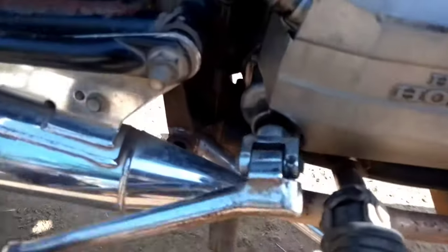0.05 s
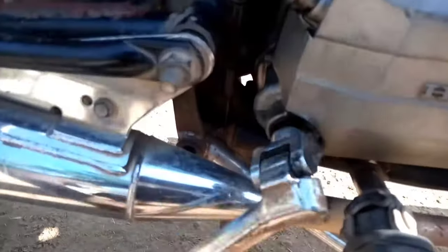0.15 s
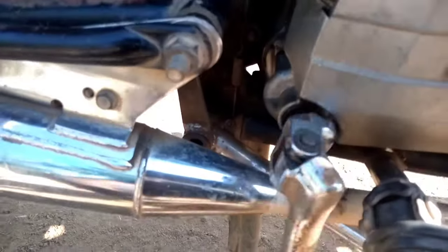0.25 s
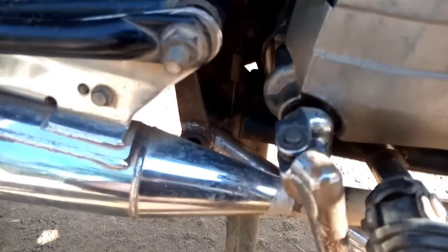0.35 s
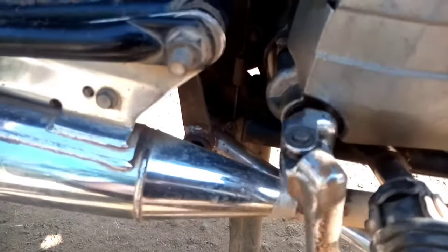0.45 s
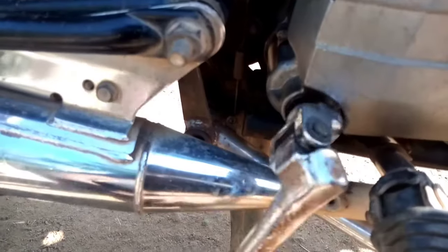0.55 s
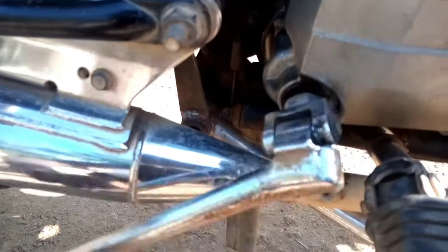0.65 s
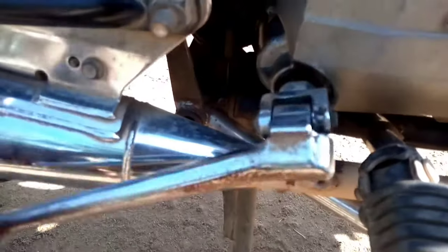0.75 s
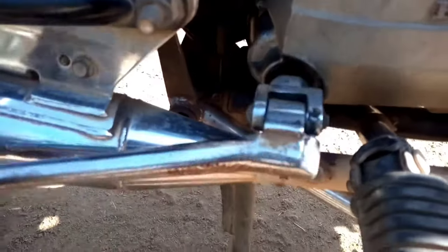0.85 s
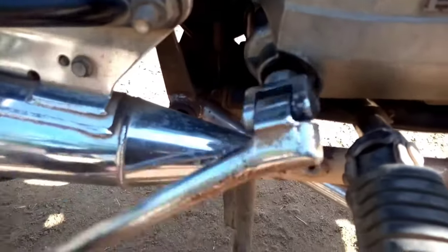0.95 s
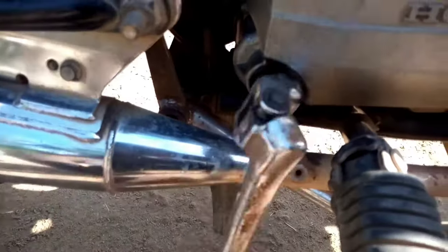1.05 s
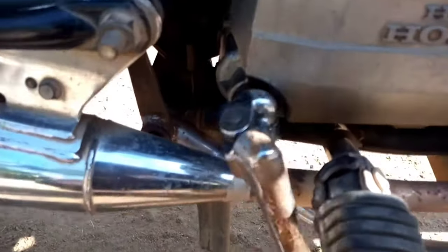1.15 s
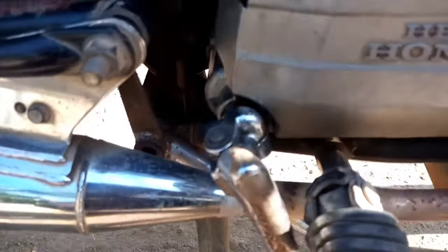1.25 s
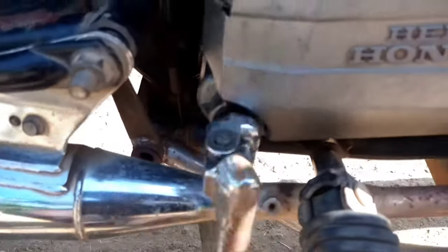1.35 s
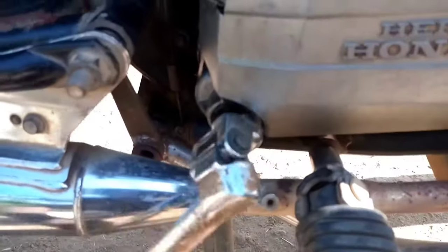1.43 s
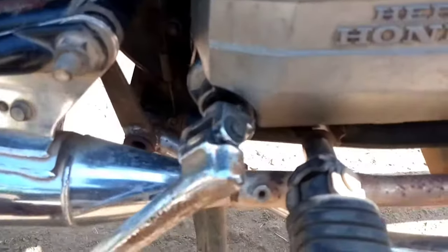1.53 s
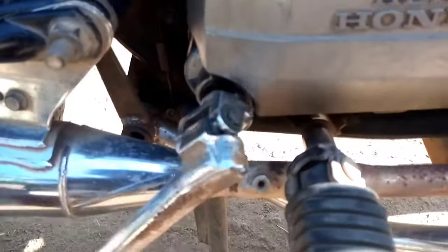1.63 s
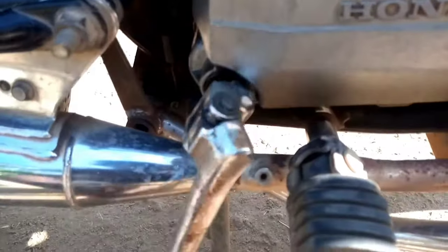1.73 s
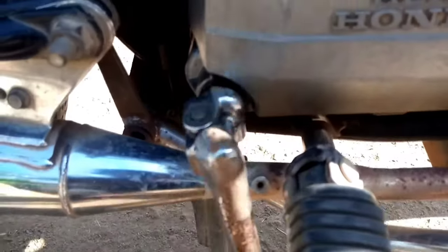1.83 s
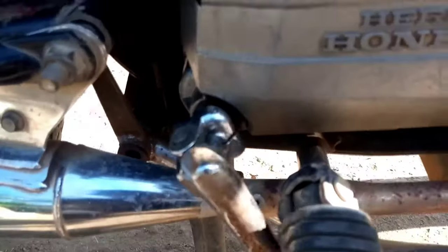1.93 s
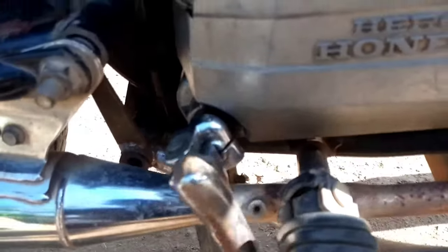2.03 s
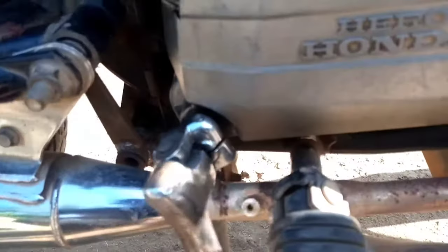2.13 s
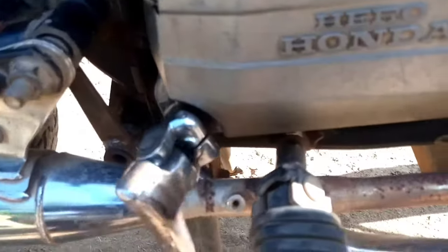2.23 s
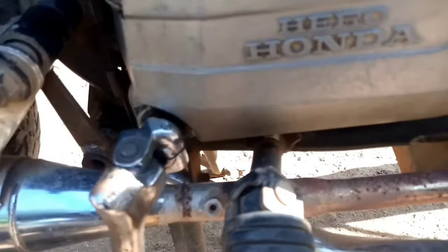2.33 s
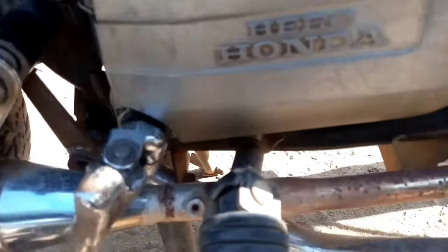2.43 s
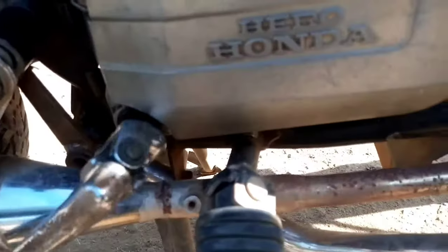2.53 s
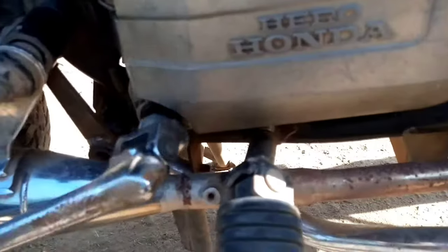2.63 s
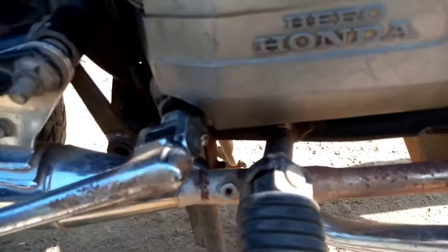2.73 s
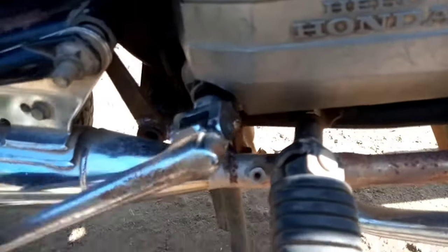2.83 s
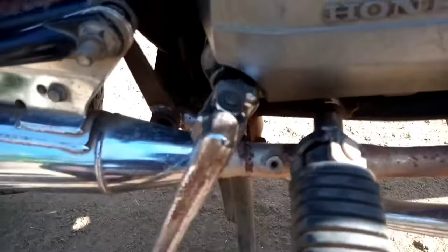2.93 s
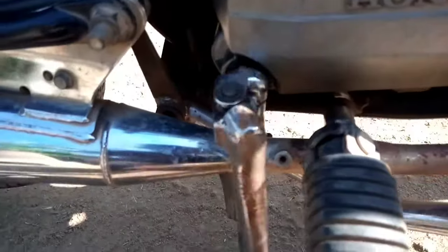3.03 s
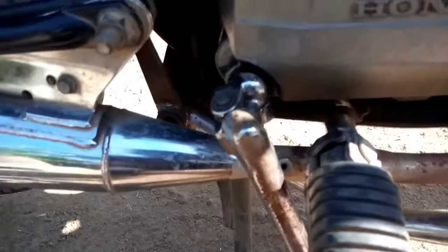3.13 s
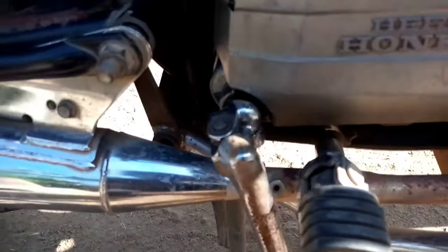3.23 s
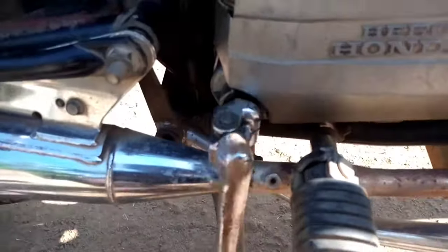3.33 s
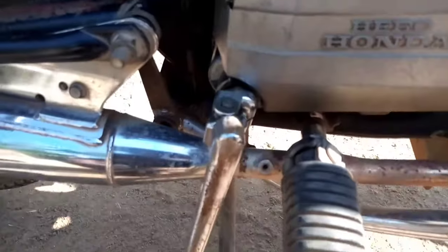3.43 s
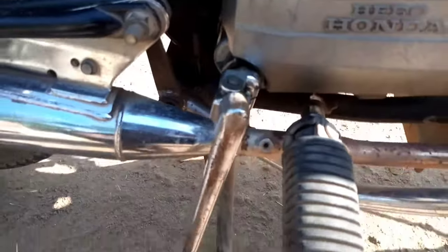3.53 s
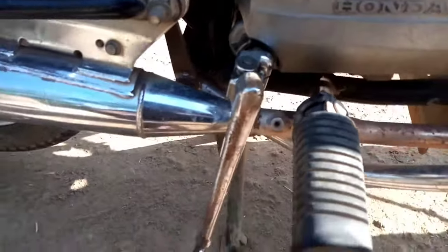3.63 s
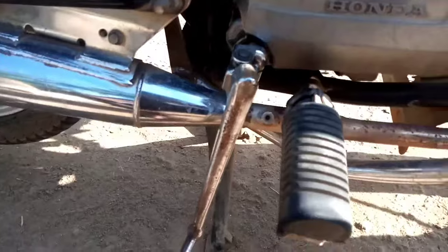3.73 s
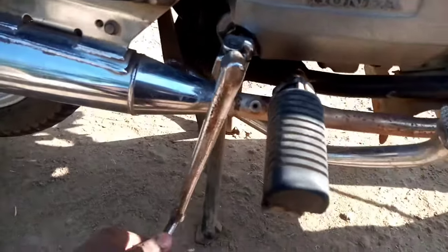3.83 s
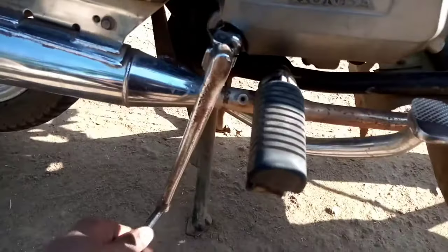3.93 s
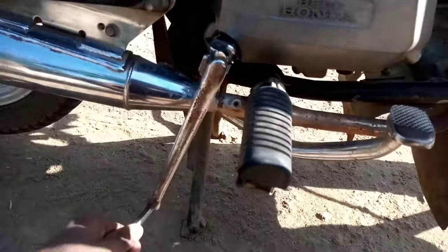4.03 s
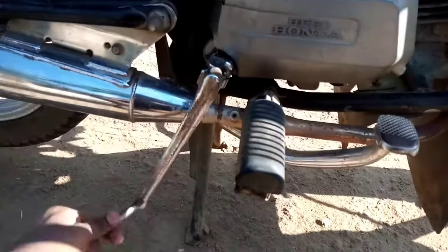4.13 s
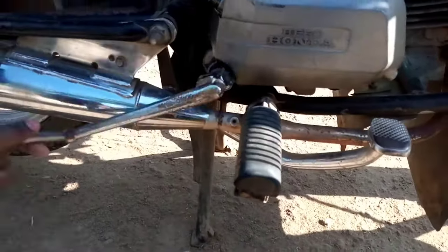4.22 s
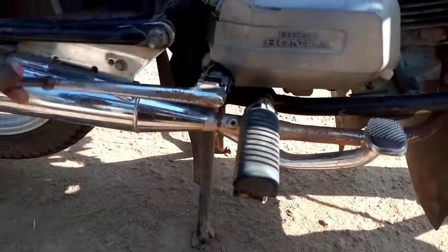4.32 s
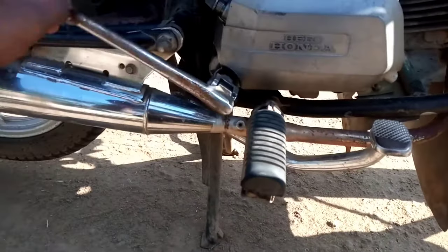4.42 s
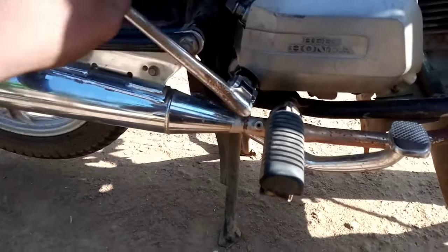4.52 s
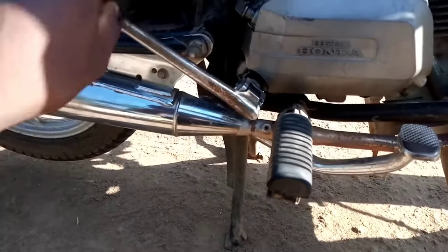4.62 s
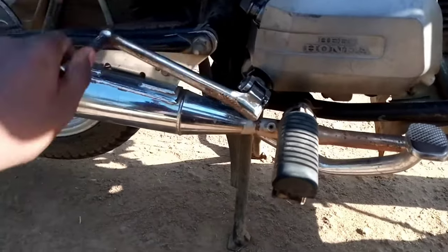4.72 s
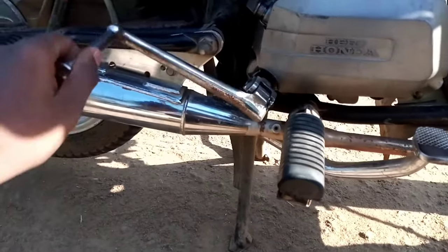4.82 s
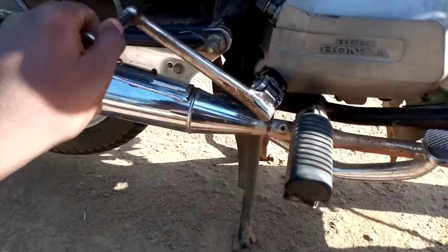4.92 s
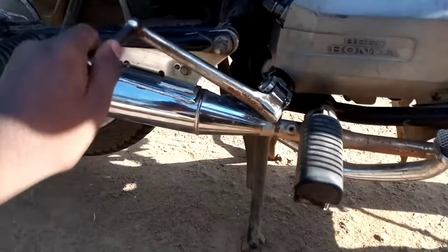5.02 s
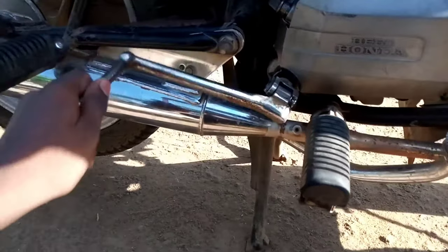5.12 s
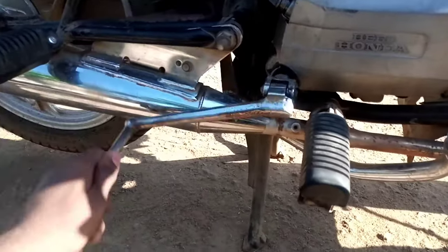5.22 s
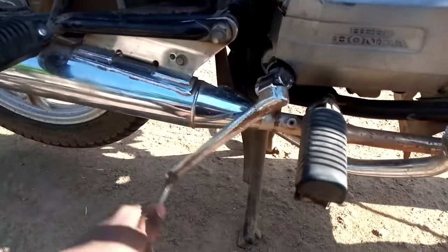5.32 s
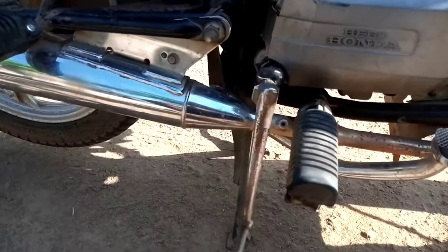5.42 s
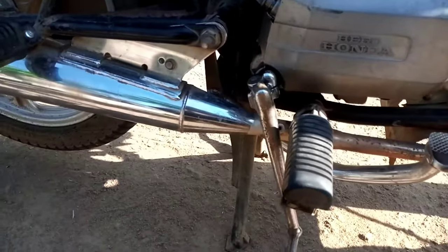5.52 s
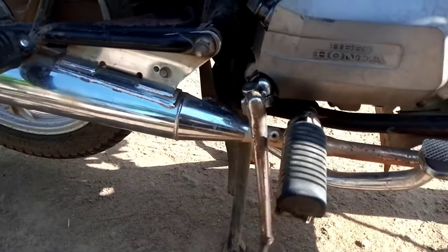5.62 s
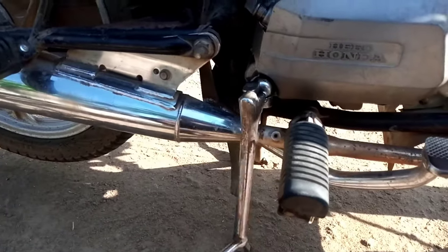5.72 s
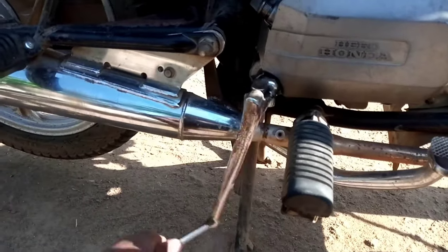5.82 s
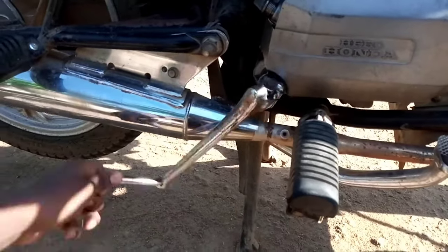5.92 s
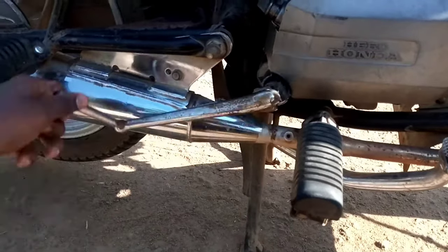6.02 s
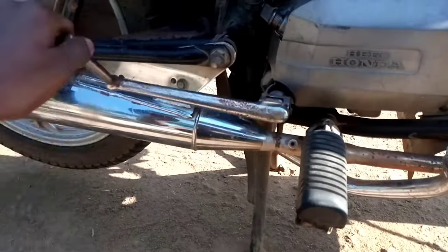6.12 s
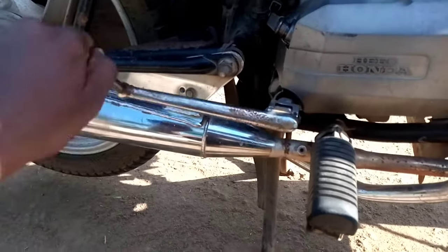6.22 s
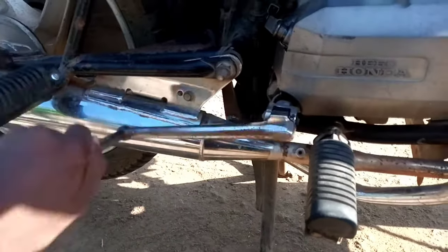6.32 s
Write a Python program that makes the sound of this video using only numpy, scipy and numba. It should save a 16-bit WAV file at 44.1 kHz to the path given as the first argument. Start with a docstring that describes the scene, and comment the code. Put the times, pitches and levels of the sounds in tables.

```python
"""A loose motorcycle kick-start lever is swung round by hand, outdoors, heard from close by.
Ratchet and pivot knock and rattle: bursts of noise contacts that also ring lever and crankcase resonators.
Gears grind and steel scrapes: banded noise that swells and coasts with each push on the lever.
The pivot squeals, pips, chirps, whistles and creaks: near-harmonic tones on pitch and level curves.
Below lie low grip rumbles, thin peeps, a faint street hush of banded noise and a far whine."""
import sys
import numpy as np
from scipy import signal
from scipy.io import wavfile
from numba import njit

SR = 44100
rng = np.random.default_rng(int(sys.argv[2]) if len(sys.argv) > 2 else 0)


def pcm_store(signal):
    """Save signal as 16-bit PCM."""
    levels = np.round(np.clip(np.atleast_2d(signal), -1, 1) * 32767)
    wavfile.write(sys.argv[1], SR, levels.astype(np.int16).T)


N = 280476


def amp(db):
    """dB to gain."""
    return 10 ** (np.asarray(db) / 20)


def rms_one(x):
    """Scale to rms 1."""
    return x / np.sqrt(np.mean(x ** 2) + 1e-20)


def in_time(rows):
    """Interpolate the columns of a curve at every sample."""
    s, *columns = np.transpose(rows)
    return [np.interp(np.arange(N) / SR, s, column) for column in columns]


def at_hz(points, hz):
    """Read a spectrum in dB on a log frequency axis."""
    f_hz, level_db = np.array(points)[:, 0], np.array(points)[:, 1]
    return np.interp(np.log(hz), np.log(f_hz), level_db)


def drift(rate_hz):
    """Slow random curve of rms 1: noise through two equal poles, at 1/40 of the sample rate."""
    r = np.exp(-80 * np.pi * rate_hz / SR)
    noise = rng.standard_normal(N // 40 + 1002)
    slow = signal.lfilter([1], [1, -2 * r, r * r], noise)[1000:]  # drop the filter's start
    return np.interp(np.arange(N) / 40, np.arange(len(slow)), rms_one(slow))


def bands():
    """Bank of band-passes 0.4 octave wide, with their centres in Hz."""
    edges_hz = 25 * 2 ** (np.arange(0, 25) * .4)
    bank = []
    for low, high in zip(edges_hz, edges_hz[1:]):
        sos = signal.butter(2, [low, high], "band", fs=SR, output="sos")
        bank.append((np.sqrt(low * high), sos))
    return bank


def grit(spread_db):
    """Two noises of uneven grains at the same moments: many small contacts, a few large."""
    size_db = spread_db * np.minimum(rng.exponential(1, N), 5)
    return rms_one(rng.standard_normal((2, N)) * amp(size_db))


def coloured(pair, spectrum, patchiness):
    """Two noises dealt in turn to the band bank; neighbouring bands flicker apart; rms 1."""
    out = 0
    flickers = [np.maximum(0.5 + patchiness / 11.0 * drift(15), 0) for _ in range(7)]
    for k, (hz, sos) in enumerate(bands()):
        if spectrum[0][0] / 1.5 < hz < spectrum[-1][0] * 1.2:
            band = signal.sosfilt(sos, pair[k % 2])
            out = out + amp(at_hz(spectrum, hz)) * flickers[k % 7] * band
    return rms_one(out)


def tone(rows, overtones, wobble, flutter_db, flutter_hz=90, rough=0.):
    """Near-harmonic tone on a pitch and level curve; roughness breaks up high overtones most."""
    out = np.zeros(N)
    span = slice(max(round(rows[0][0] * SR), 0), round(rows[-1][0] * SR))
    hz, db, *own_rough = (column[span] for column in in_time(rows))
    share = np.clip(own_rough[0] if own_rough else rough, 0, 1)
    phase = 2 * np.pi * np.cumsum(hz * (1 + wobble * drift(150)[span])) / SR
    flutter = flutter_db * (drift(25) + drift(flutter_hz))[span]
    for k, overtone_db in overtones:
        broken = 1 - (1 - share) ** k
        uneven = (drift(130) + 1j * drift(130))[span] / np.sqrt(2)
        envelope = np.sqrt(1 - broken) + np.sqrt(broken) * uneven
        wave = np.imag(envelope * np.exp(1j * k * phase))
        out[span] += np.sqrt(2) * amp(db + overtone_db + flutter) * wave
    out[span] *= signal.windows.tukey(len(hz), min(200 / len(hz), 1))
    return out


# street hush spectrum: [f/Hz, density/dB per Hz]
HUSH_SPECTRUM = [(25, -20.5), (60, 0), (130, 6.5), (300, -16), (800, -33.5), (1500, -38.5), (6000, -24),
                 (9000, -24.5), (17000, -34)]
HUSH_RMS_DB = -75


def hush():
    """Faint street hush: steady noise, its bands flickering slightly."""
    return amp(HUSH_RMS_DB) * coloured(rng.standard_normal((2, N)), HUSH_SPECTRUM, patchiness=-1.0)


# far whine, sinking in pitch: [t/s, f/Hz, level/dB]
WHINE_CURVE = [(3.45, 673, -83.5), (3.73, 657, -82.5), (3.82, 621, -90.5), (4.1, 597, -90)]
# its overtones: [multiple, level/dB]
WHINE_PARTIALS = [(1, 0.), (2, 0.)]


def whine():
    """Far two-partial tone of unsteady pitch and level."""
    return tone(WHINE_CURVE, WHINE_PARTIALS, wobble=.012, flutter_db=2.5)


# hand shifting its grip: [t/s, length/s, level/dB]
GRIP_SHIFTS = [(3.5, 0.077, -74), (3.649, 0.13, -64), (3.821, 0.0746, -78.5)]
# rumble band edges: [low f/Hz, high f/Hz]
GRIP_BAND_HZ = (91.6, 180.2)


def grip():
    """Low band noise under rounded swells."""
    t = np.arange(N) / SR
    swells = np.zeros(N)
    for s, length_s, db in GRIP_SHIFTS:
        swells += amp(db) * np.sin(np.pi * np.clip((t - s) / length_s, 0, 1)) ** .5
    sos = signal.butter(2, GRIP_BAND_HZ, "band", fs=SR, output="sos")
    return swells * rms_one(signal.sosfilt(sos, rng.standard_normal(N)))


# thin high peeps, a curve each: [t/s, f/Hz, level/dB]
PEEP_CURVES = [
    [(4.918, 6370, -76.5), (4.98, 6500, -76), (5.005, 6300, -73.5)],
    [(6.262, 5850, -72), (6.28, 6030, -76), (6.32, 6100, -71), (6.345, 6100, -70)],
]


def peeps():
    """Single slightly rough partials."""
    return sum(tone(rows, [(1, 0.)], wobble=.006, flutter_db=2.5, rough=.2) for rows in PEEP_CURVES)


# short pivot pips: [t/s, f/Hz, peak level/dB, length/s]
PIP_NOTES = [(2.966, 8550, -25, .016), (5.674, 900, -47, .018)]


def pips():
    """Brief stick-slip notes of the pivot: sines with a rounded swell."""
    out = np.zeros(N)
    for s, hz, db, length_s in PIP_NOTES:
        t = np.arange(round(length_s * SR)) / SR
        i = round(s * SR)
        out[i:i + len(t)] += amp(db) * np.sin(np.pi * t / length_s) * np.sin(2 * np.pi * hz * t)
    return out


# pivot squeals, a curve each: [t/s, f/Hz, level/dB]
SQUEAL_CURVES = [
    [(0, 2600, -69.5), (.07, 2650, -67)],
    [(5.44, 2660, -80), (5.465, 2640, -50), (5.5, 2590, -74), (5.53, 2630, -63), (5.7, 2674, -61),
     (5.9, 2690, -63), (6.1, 2550, -69), (6.2, 2620, -77), (6.235, 2600, -65), (6.25, 2570, -80)],
]
# their overtones: [multiple, level/dB]
SQUEAL_PARTIALS = [(1, 0.), (2, -5)]


def squeals():
    """Pivot squeals: two rough partials, unsteady in pitch and level."""
    return sum(tone(rows, SQUEAL_PARTIALS, wobble=.011, flutter_db=2.5, rough=.15)
               for rows in SQUEAL_CURVES)


# pivot chirp: [t/s, f/Hz, level/dB, roughness 0-1]
CHIRP_CURVE = [(2.045, 2390, -63, .1), (2.061, 2400, -63, .1), (2.067, 2510, -37, .15),
               (2.075, 2590, -33, .2), (2.086, 2770, -36, .3), (2.097, 2830, -33, .03),
               (2.108, 2790, -34, .02), (2.118, 2750, -60, .1)]
# its overtones: [multiple, level/dB]
CHIRP_PARTIALS = [(1, 0.), (2, -8), (3, -14), (4, -27)]


def chirp():
    """One pivot chirp: a harmonic tone that rises, then sags a little."""
    return tone(CHIRP_CURVE, CHIRP_PARTIALS, wobble=.006, flutter_db=.7)


# pivot whistle: [t/s, f/Hz, level/dB]
WHISTLE_CURVE = [(4.652, 2740, -69), (4.667, 2850, -61), (4.677, 2675, -35), (4.683, 2700, -53)]
# pivot creak: [t/s, f/Hz, level/dB, roughness 0-1]
CREAK_CURVE = [(4.664, 1000, -66, .05), (4.675, 1040, -50, .08), (4.683, 1100, -44, .1),
               (4.692, 1030, -47, .2), (4.702, 1000, -51, .35), (4.714, 990, -57, .6)]
# creak overtones: [multiple, level/dB]
CREAK_PARTIALS = [(1, 0.), (2, -5), (3, -6), (4, -9), (5, -10), (6, -12)]


def whistle_and_creak():
    """The pivot whistles on one partial, then breaks into a lower, rougher harmonic creak."""
    whistle = tone(WHISTLE_CURVE, [(1, 0.)], wobble=.005, flutter_db=1.5)
    creak = tone(CREAK_CURVE, CREAK_PARTIALS, wobble=.015, flutter_db=1.0, flutter_hz=250)
    return whistle + creak


# lever on its stop, shaking the frame: [t/s, level/dB, f/Hz, t60/s]
STOP_SLAM = (3.2447, -23.5, 100, .04)


def slam():
    """One low swing whose pitch sags as it dies."""
    s, db, hz, t60_s = STOP_SLAM
    t = np.maximum(np.arange(N) / SR - s, 0)
    turns = hz * t + 0.85 * (1 - np.exp(-t / .001))
    return amp(db - 60 * t / t60_s) * np.sin(2 * np.pi * turns)


# pushes on the lever: [peak t/s, swell/s, coast/s, grind level/dB, scrape level/dB]
LEVER_PUSHES = [(.02, 0.32, 0.43, -71.5, -67), (0.108, 0.036, 0.44, -43.5, -49.5),
                (.344, 0.34, 0.35, -44, -65), (.55, 0.35, 0.4, -48.5, -58),
                (.718, 0.077, 0.4, -51.5, -59.5), (0.967, 0.15, 0.34, -43.5, -53.5),
                (1.148, 0.084, 0.15, -57.5, -61), (1.254, .07, 1, -59, -60.5),
                (1.436, 0.34, 0.17, -42, -57.5), (1.753, 0.12, 0.28, -43.5, -52),
                (2.12, 0.23, 0.33, -96, -62.5), (2.276, 0.084, 1, -56.5, -71.5),
                (2.514, 0.6, 0.65, -52.5, -62.5), (2.998, 0.2, 0.16, -44.5, -52.5),
                (3.13, 0.37, 0.62, -57.5, -65), (3.273, 0.074, 0.24, -48, -44.5),
                (3.501, 0.34, 0.51, -137, -64), (3.672, 0.028, 0.52, -92, -58),
                (4.041, 0.078, 0.16, -70, -96), (4.177, 0.084, 1, -56, -59.5),
                (4.43, 0.54, 0.25, -58.5, -59), (4.72, 0.06, 0.25, -55.5, -67.5),
                (4.985, 0.44, 0.25, -92.5, -70), (5.12, 0.045, 0.058, -41.5, -50),
                (5.289, 0.088, 0.69, -50, -52.5), (5.7, 0.24, 0.18, -72, -64.5),
                (5.822, 0.031, 0.88, -46, -57.5), (5.931, 0.1, 0.21, -46.5, -54.5),
                (6.14, 0.16, 0.036, -73, -59), (6.355, 0.18, .3, -57, -59.5)]
SWING_DB = 30  # level change over one swell or coast time
REST_DB = -103.5  # floor of grind and scrape


def motion():
    """Grind and scrape levels in dB: each push swells, then coasts to rest; powers add."""
    step = 64
    t = np.arange(0, N + step, step) / SR
    s, swell_s, coast_s, *levels_db = np.transpose(LEVER_PUSHES)[:, :, None]
    before = (s - t) / np.maximum(swell_s, .01)
    after = (t - s) / np.maximum(coast_s, .01)
    fall_db = SWING_DB * np.maximum(before, after)
    curves = []
    for db in levels_db:
        power = (amp(db - fall_db) ** 2).sum(axis=0) + amp(REST_DB) ** 2
        curves.append(np.interp(np.arange(N) / SR, t, 10 * np.log10(power)))
    return curves


# steel slide, with a low rumble from the hand on the lever: [f/Hz, density/dB per Hz]
SCRAPE_SPECTRUM = [(40, -8), (130, 7), (350, -27.5), (900, -25.5), (1800, -3), (3000, -1), (6300, 3.5),
                   (8000, -6.5), (11000, -4.5), (17000, -32)]
SCRAPE_TREBLE_HZ, SCRAPE_BRIGHT_DB = 7000, -55
SCRAPE_DULLING_DB_PER_DB = .45  # extra treble fall as the slide slows


def scrape(scrape_db):
    """Steel slides on steel in fine grains, duller when slow."""
    grains = coloured(grit(1.5) * amp(1.2 * drift(60)), SCRAPE_SPECTRUM, patchiness=1.8)
    body = signal.sosfilt(signal.butter(1, SCRAPE_TREBLE_HZ, fs=SR, output="sos"), grains)
    treble_db = SCRAPE_DULLING_DB_PER_DB * (scrape_db - SCRAPE_BRIGHT_DB)
    return amp(scrape_db) * (body + amp(treble_db) * (grains - body))


# crankcase resonances: [f/Hz, width/Hz, level/dB]
CASE_MODES = [(158.3, 5, -0.5), (386, 44, 10.5), (592.5, 51, -3.5), (858, 27, -8.5), (1147, 9.6, -8),
              (1510, 38, -10), (1807, 6, -2.5)]


def crankcase(x):
    """Parallel resonances of the hollow engine cover, alternating in sign."""
    out = 0
    for k, (hz, width_hz, db) in enumerate(CASE_MODES):
        r = np.exp(-np.pi * width_hz / SR)
        poles = [1, -2 * r * np.cos(2 * np.pi * hz / SR), r * r]
        ring = signal.lfilter([1, 0, -1], poles, x)
        out = out + (-1) ** k * amp(db) * (1 - r * r) / 2 * ring
    return out


# gear and shaft grind: [f/Hz, density/dB per Hz]
GRIND_SPECTRUM = [(40, -25), (120, -6.5), (383, -3), (480, -5), (900, -8), (2000, -15.5), (3900, -36)]


def gears(grind_db):
    """Gear teeth and shaft grind: rough low noise that makes the cover hum."""
    rough = coloured(grit(0.85) * amp(2.3 * drift(21)), GRIND_SPECTRUM, patchiness=2.5)
    return amp(grind_db) * rms_one(rough + amp(2.5) * crankcase(rough))


# ratchet and pivot knocks: [t/s, level/dB, clank re level/dB, rattle t60/s before band stretch]
STEEL_KNOCKS = [(0.069, -24.5, -6, 0.033), (0.086, -13.5, -1, 0.027), (0.092, -24.5, 14, 0.06),
                (0.099, 3, -16, 0.013), (.179, -32, 4, 0.084), (0.2405, -29.5, 3, 0.03),
                (0.271, -15, 2.5, 0.023), (0.3245, -4, -9.5, 0.038), (0.4736, -20, 2.5, 0.027),
                (0.5112, -17.5, 3, 0.049), (0.5377, -19, 0, 0.012), (0.5788, -17.5, 9.5, 0.075),
                (0.6298, -19, 6, 0.028), (0.6891, -10, -3, 0.039), (.705, -7, -2, 0.017),
                (0.7656, -11.5, -20, 0.0075), (0.773, -14, 2, 0.026), (0.7904, -21.5, 6, 0.017),
                (0.853, -26.5, 10, 0.023), (0.9146, -37, 15, 0.019), (0.9412, -24, 10.5, 0.049),
                (0.962, -15, -2, 0.012), (0.9754, -16.5, 3.5, 0.023), (1.0345, -34, 6, 0.057),
                (1.0664, -30.5, -1, .039), (1.1169, -12, -4, 0.029), (1.144, -19.5, 6.5, 0.032),
                (1.173, -33, 7, 0.038), (1.2282, -5.5, -12, 0.018), (1.2349, -3, 2, 0.011),
                (1.2415, -1, -8, 0.029), (1.276, 0, -18, 0.016), (1.3557, -21.5, -2, 0.024),
                (1.3713, -15.5, 4, 0.022), (1.386, -18, 1, 0.033), (1.41, -22.5, 4, 0.067),
                (1.4175, -16, 0, 0.039), (1.427, -20, -13, 0.014), (1.437, -7.5, -6.5, 0.025),
                (1.6386, -40, 15, 0.036), (1.668, -32, 8.5, 0.079), (1.721, -4, -5.5, 0.038),
                (1.7474, -17.5, -4, 0.011), (1.7665, -27, 8, 0.019), (1.8606, -41, 3, 0.095),
                (1.91, -18, -32, 0.0065), (1.954, -32, 10, 0.057), (2.2542, -9.5, -5.5, 0.038),
                (2.3142, -25, 5, 0.041), (2.316, -22.5, -1.5, 0.015), (2.366, -40, -2, 0.2),
                (2.378, -18, 5, 0.038), (2.4291, -20, 8.5, 0.033), (2.486, -22.5, 9, 0.062),
                (2.4929, -13, -14, 0.017), (2.528, -21, 9, 0.015), (2.584, -38, 8, 0.054),
                (2.595, -20, 9, 0.026), (2.635, -35, -10, 0.048), (2.6636, -12, -13, 0.02),
                (2.8247, -46.5, 13.5, 0.18), (2.888, -41.5, 12, 0.34), (2.907, -33.5, 7, 0.13),
                (2.987, -14, -0.5, 0.06), (2.9985, -32.5, 14.5, 0.086), (3.021, -26, 1, 0.048),
                (3.052, -29, 9, 0.022), (3.091, -11, -11, 0.025), (3.13, -21, 7, 0.031),
                (3.2224, -22, 3, 0.014), (3.243, -1, -9.5, 0.034), (3.3353, -19.5, 6, 0.038),
                (4.1361, -16.5, 7.5, 0.051), (4.1572, -29.5, -11, 0.081), (4.18, -16.5, 8, 0.03),
                (4.2, -20.5, 4, 0.055), (4.236, -22, -1, 0.062), (4.2577, -37, 15.5, 0.086),
                (4.267, -33, 9, 0.027), (4.2898, -28, -9, 0.024), (4.3276, -33, 4, 0.052),
                (4.3677, -36.5, 2, 0.068), (4.7158, -19, 6, 0.028), (4.82, -49, 13.5, 0.045),
                (4.921, -64, 5, 0.068), (5.009, -42, 7, 0.068), (5.0979, -4, -3.5, 0.025),
                (5.1528, -21, 0.5, 0.05), (5.1831, -29, 4.5, 0.084), (5.2003, -30, 2, 0.077),
                (5.2107, -29, 7, 0.055), (5.2538, -8, -1, 0.042), (5.2746, -16, 1, 0.11),
                (5.2855, -1, -14, 0.035), (5.331, -28.5, 9, 0.17), (5.6188, -29.5, 15.5, 0.015),
                (5.678, -38, 18.5, 0.013), (5.7925, -25.5, 11.5, 0.043), (5.7987, -13.5, -13, 0.022),
                (5.82, -30, 3, 0.034), (5.86, -40, 18, 0.034), (5.8955, -26.5, -2, 0.027),
                (5.911, -18.5, 8, 0.014), (5.925, -10, -21, 0.025), (5.9377, -16.5, 5.5, 0.025),
                (5.9688, -16.5, 1, 0.026), (6.0012, -16.5, 0.5, 0.011), (6.029, -31, -8, 0.026),
                (6.054, -26, 9, 0.017), (6.064, -22.5, -3, 0.017), (6.096, -53, -4, 0.016),
                (6.135, -50, -5, 0.02), (6.27, -38, 11, 0.0063), (6.347, -36, 8.5, 0.083),
                (6.3565, -19.5, -43, 0.041)]
LOOSE_COUNT, LOOSE_FROM_DB = 340, -60  # ticks of play; grind level needed to shake them loose
LOOSE_RE_GRIND_DB, LOOSE_SCATTER_DB, LOOSE_CLANK_DB, LOOSE_T60_S = 6.5, 6, 4, 0.013


def with_loose_ticks(grind_db):
    """The knocks plus small ticks at random moments whose strength follows the grind."""
    when, size = rng.random(LOOSE_COUNT), rng.standard_normal(LOOSE_COUNT)
    shake_db = grind_db[(when * N).astype(int)]
    db = shake_db + LOOSE_RE_GRIND_DB + LOOSE_SCATTER_DB * np.minimum(size, 1.4)
    db = db - 60 * (shake_db < LOOSE_FROM_DB)
    ticks = [(s, d, LOOSE_CLANK_DB, LOOSE_T60_S) for s, d in zip(when * N / SR, db)]
    return np.transpose(STEEL_KNOCKS + ticks)


@njit
def dying(at, heights, fast, slow, tail, lag, size):
    """Sum of quick starts that die with a fast and a slower part."""
    out = np.zeros(size)
    for k in range(len(at)):
        a, b, gap, i = heights[k], heights[k] * tail, 1., at[k]
        while i < size and b > 3e-6:
            gap = max(gap * lag, 1e-9)
            out[i] += (a + b) * (1 - gap)
            a, b, i = max(a * fast[k], 1e-9), b * slow[k], i + 1
    return out


# centres of thud, clank, body, sizzle: [f/Hz]
KNOCK_COLOUR_HZ = [450, 1600, 4500, 10000]
USUAL_KNOCK_DB, SOFT_KNOCK_DB = -24, -43  # below the soft level colour stays fixed
THUD_DB, THUD_DB_PER_DB = -19, -0.85  # hard blows add little bass
SIZZLE_DB, SIZZLE_DB_PER_DB = -6, 0.36  # hard blows are brighter


def strikes(blows, hz, scatter_db, stretch, tail_db):
    """Envelope of all knocks as felt at one frequency: a sharp tick, then a dying rattle."""
    s, db, clank_db, t60_s = blows
    over_db = np.maximum(db, SOFT_KNOCK_DB) - USUAL_KNOCK_DB
    thud_db = THUD_DB + THUD_DB_PER_DB * over_db
    sizzle_db = SIZZLE_DB + SIZZLE_DB_PER_DB * over_db
    share = [np.interp(np.log(hz), np.log(KNOCK_COLOUR_HZ), row) for row in np.eye(4)]
    colour_db = share[0] * thud_db + share[1] * clank_db + share[3] * sizzle_db  # body: 0 dB
    chance_db = np.clip(rng.normal(0, scatter_db, len(s)), -12, 5)
    heights = amp(db + colour_db + chance_db)
    slow = amp(-60 / (SR * stretch * np.clip(t60_s, .008, .2)))
    lag = np.exp(-1 / (.0007 * SR))  # each knock rises over about 0.7 ms
    return dying((s * SR).astype(np.int64), heights, slow ** 17.4, slow, amp(tail_db), lag, N)


# knock spectrum: [f/Hz, level/dB per band]
KNOCK_SPECTRUM = [(100, -21.5), (200, -14.5), (400, -8.5), (800, -12.5), (1600, -19), (3000, -16.5),
                  (5000, -2.5), (7000, -10.5), (9000, -8), (16000, -27)]
# lever modes: [f/Hz, level/dB, t60/s]
LEVER_MODES = [(1720, -9, .04), (1990, -8, .045), (2790, -13, .03), (3420, -5, .05), (3870, -10, .04),
               (4300, -6, .03), (4930, -3, .04), (5310, -6, .03), (5750, -8, .03), (6460, -9, .04),
               (8550, -12, .04)]
RING_DB, RING_SCATTER_DB = -30, 6  # lever ring under a blow, blow-to-blow change
SLIDE_RING_DB = -5  # drive of the ring by the slide, re scrape level


def knocks(blows, scrape_db):
    """Bursts of contacts: a broad crack whose lows last longer, plus the ring of the lever."""
    contacts, out = grit(3.97), 0
    for k, (hz, sos) in enumerate(bands()[5:]):
        # a band's share of noise power grows with its centre
        unit = np.sqrt(SR / hz) * amp(at_hz(KNOCK_SPECTRUM, hz))
        envelope = strikes(blows, hz, 4.9, 1.175 * (4500 / hz) ** 0.33, tail_db=-7.5)
        out = out + unit * signal.sosfilt(sos, contacts[k % 2] * envelope + 1e-12)
    for hz, level_db, t60_s in LEVER_MODES:
        r = amp(-60 / (np.clip(t60_s, .01, .07) * SR))
        w = 2 * np.pi * hz / SR
        slide = amp(scrape_db + SLIDE_RING_DB + 5 * drift(8))
        blow = strikes(blows, hz, RING_SCATTER_DB, .4, tail_db=-3.0)
        drive = contacts[0] * blow + contacts[1] * slide
        ring = signal.lfilter([0, np.sin(w)], [1, -2 * r * np.cos(w), r * r], drive)
        out = out + amp(level_db + RING_DB) * ring
    return out


# ground, engine block and walls: [delay t/s, level/dB]
REFLECTIONS = [(0.014, -25), (0.028, -31.5), (0.06, -34.5), (0.096, -42.5)]


def echoes(x):
    """Dull reflections, each smeared by noise over 1200 samples (27 ms)."""
    tail = np.zeros(round(.16 * SR))
    for s, db in REFLECTIONS:
        i = round(s * SR)
        tail[i:i + 1200] += amp(db) * rng.standard_normal(1200) / np.sqrt(1200)
    return signal.fftconvolve(signal.lfilter([.6], [1, -.4], x), tail)[:N]


def scene():
    """Lever, gears and pivot tones over the street hush; only the knocks, pivot tones and peeps echo."""
    grind_db, scrape_db = motion()
    hits = knocks(with_loose_ticks(grind_db), scrape_db)
    echoing = hits + amp(4.5) * crankcase(hits)
    echoing = echoing + pips() + chirp() + whistle_and_creak() + squeals() + peeps()
    far = hush() + whine()
    moving = gears(grind_db) + scrape(scrape_db)
    return (echoing + echoes(echoing) + slam() + grip() + moving + far)[None]


def bell(x, hz, width_hz, db):
    """Peaking filter: raise or lower one region of the spectrum."""
    w, a = 2 * np.pi * hz / SR, amp(db / 2)
    alpha = np.sin(w) * width_hz / hz / 2
    zeros = [1 + alpha * a, -2 * np.cos(w), 1 - alpha * a]
    poles = [1 + alpha / a, -2 * np.cos(w), 1 - alpha / a]
    return signal.lfilter(zeros, poles, x)


# microphone dip: [f/Hz, width/Hz, level/dB]
DIP = (12750, 5500, -13)
# microphone port peak: [f/Hz, width/Hz, level/dB]
PORT_PEAK = (15300, 2300, 11)
KNEE_HZ, CUTOFF_HZ = 16650, 17300


def record(dry):
    """Microphone bass cut, dip and port peak; the top falls away above a knee and is then cut."""
    heard = signal.sosfilt(signal.butter(3, 50, "high", fs=SR, output="sos"), dry)
    heard = bell(bell(heard, *DIP), *PORT_PEAK)
    soft = signal.sosfilt(signal.cheby2(10, 28, KNEE_HZ, fs=SR, output="sos"), heard)
    return signal.sosfilt(signal.cheby2(12, 70, CUTOFF_HZ, fs=SR, output="sos"), soft)


dry = scene()
out = record(dry)
pcm_store(out)
```